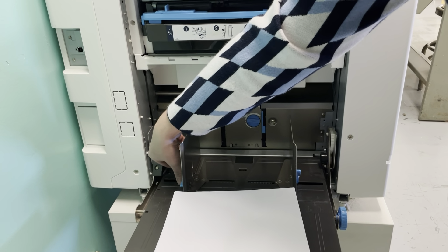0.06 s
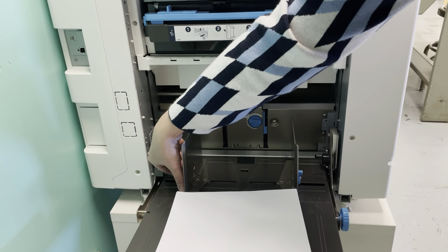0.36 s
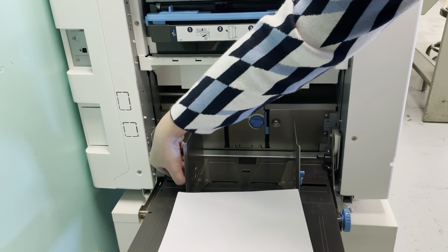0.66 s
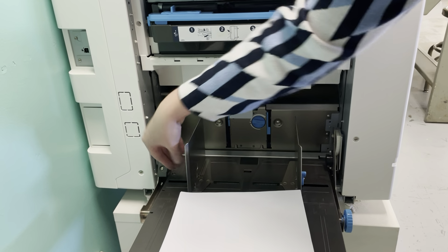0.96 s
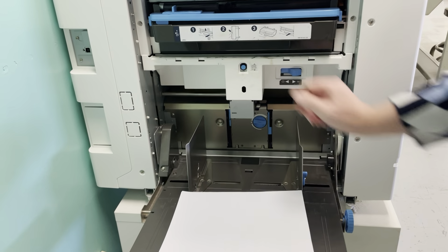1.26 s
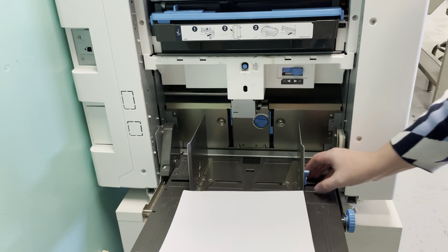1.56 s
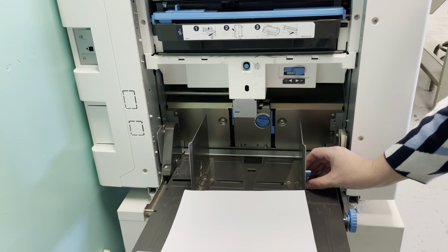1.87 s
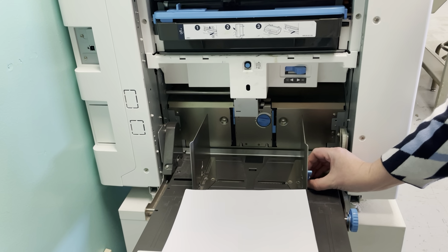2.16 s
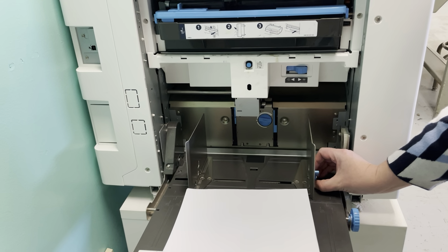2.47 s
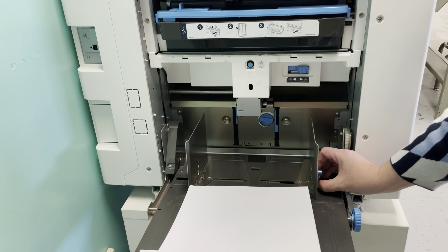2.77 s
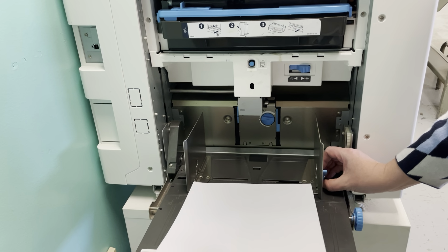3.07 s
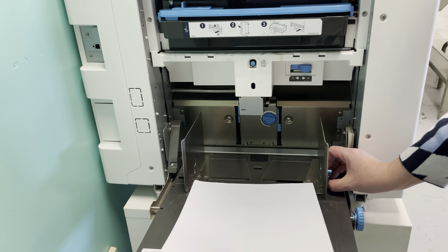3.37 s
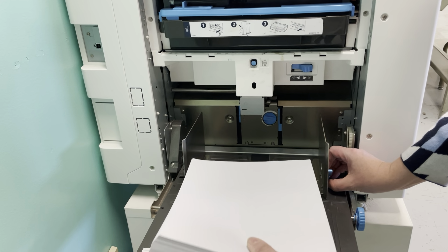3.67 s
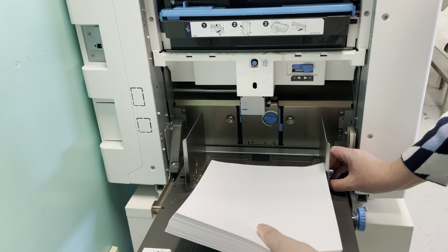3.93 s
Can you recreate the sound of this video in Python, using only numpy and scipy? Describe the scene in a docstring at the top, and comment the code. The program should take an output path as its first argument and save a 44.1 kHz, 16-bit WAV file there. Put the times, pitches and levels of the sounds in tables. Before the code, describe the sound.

Sharp clicks of a printer's paper guides being set, over steady fan noise and hum.

```python
"""Setting a printer's paper guides

A hand sets the plastic guides on the feed tray, over steady fan noise and motor hum. The left lock
lever knocks, snaps over with a short metallic ring and seats; each click rings tray, guide and latch.
The right guide is gripped and nudged: it ticks, catches and scrapes in its rail. The pushed tray
gives short hollow notes, and skin and paper brush it faintly."""
import sys
import numpy as np
from scipy import signal
from scipy.fft import rfft, irfft
from scipy.io import wavfile

SR = 44100
rng = np.random.default_rng(int(sys.argv[2]) if len(sys.argv) > 2 else 0)


def materialize(psi):
    """Save the field psi as 16-bit PCM at rate SR to the path in sys.argv[1].

    A 1-D psi becomes a single channel; in a 2-D psi each row is a channel.
    """
    bounded = np.clip(np.atleast_2d(psi).T, -1, 1)
    quanta = np.round(bounded * 32767).astype(np.int16)
    wavfile.write(sys.argv[1], SR, quanta)


N = 176400
T = np.arange(N) / SR
HZ = np.maximum(np.arange(N // 2 + 1) * SR / N, 1)
SIDES = np.array([[.5], [-.5]])  # left, right
ATTACK_S, SLIDE_EDGE_S, SLIP_RATE_HZ = 0.0015, 0.041, 210

# coherence of the two microphones: (frequency [Hz], coherence [0-1])
COHERENCE = [(40, 1), (110, 0.97), (200, 1), (320, 0.16), (700, 0.25), (1300, 0.046), (3000, 0.15),
             (5000, 0.37), (8000, 1), (15000, 1)]


def from_db(db):
    """Decibels to gain."""
    return 10 ** (np.asarray(db) / 20)


def unit_rms(x):
    """Scale to rms 1."""
    return x / np.sqrt(np.mean(np.abs(x) ** 2) + 1e-20)


def at_hz(points, hz=HZ):
    """Interpolate a table over log frequency."""
    freqs, values = np.transpose(points)
    return np.interp(np.log(hz), np.log(np.maximum(freqs, 1)), values)


def drift(rate_hz):
    """Random wander, rms 1: noise through two low-pass poles at rate_hz."""
    step, settle = 40, 2000
    pole = np.exp(-2 * np.pi * rate_hz * step / SR)
    white = rng.standard_normal(N // step + settle + 2)
    slow = signal.lfilter([1], [1, -2 * pole, pole * pole], white)[settle:]
    return np.interp(np.arange(N) / step, np.arange(len(slow)), unit_rms(slow))


def noise(gain):
    """Partly coherent stereo noise shaped by a gain per frequency, rms 1."""
    mid, side = rfft(rng.standard_normal((2, N)))
    coherence = at_hz(COHERENCE)
    spectrum = np.sqrt(1 + coherence) * mid + np.sqrt(1 - coherence) * side * [[1], [-1]]
    return unit_rms(irfft(gain * spectrum, N))


def contact(start_s, hold_s, t60_s):
    """Impact envelope: quick rise, short hold, exponential decay."""
    age = T - start_s
    return np.clip(age / ATTACK_S, 0, 1) * from_db(-60 * np.clip((age - hold_s) / t60_s, 0, 3))


def ring(modes, hits):
    """Each hit (time [s], level [dB]) excites damped modes at random phases."""
    out, age = np.zeros(N + SR), T[:SR // 2]
    for hz, mode_db, t60_s in modes:
        envelope = np.minimum(age / ATTACK_S, 1) * from_db(mode_db - 60 * age / t60_s)
        for start_s, hit_db in hits:
            i = int(start_s * SR)
            phase = 2 * np.pi * hz * age + rng.uniform(0, 2 * np.pi)
            out[i:i + len(age)] += from_db(hit_db) * envelope * np.sin(phase)
    return out[:N]


def friction(strokes, colour, edge_s, rough_db=1):
    """Ramped strokes of noise, roughened by tiny slips."""
    envelope = 0
    for start_s, length_s, db in strokes:
        inside_s = np.minimum(T - start_s, start_s + length_s - T)
        envelope += from_db(db) * np.clip(inside_s / edge_s + .5, 0, 1)
    slips = unit_rms(from_db(rough_db * drift(SLIP_RATE_HZ)))
    return envelope * slips * noise(from_db(at_hz(colour)))


def fans(level_db=-41):
    """Steady rush of fans and ventilation."""
    # (frequency [Hz], relative density [dB])
    colour = [(15, -46), (25, -14), (39, 2.5), (55, 2), (90, -5.5), (125, -5.5), (154, -12.5), (200, -11),
              (270, -14.5), (345, -15), (420, -15), (520, -18), (700, -16.5), (950, -19.5), (1300, -23),
              (1700, -27.5), (2250, -31.5), (3100, -32.5), (4100, -39.5), (5300, -39.5), (6900, -40.5),
              (8300, -48.5), (10500, -53.5), (13000, -55.5), (15500, -65)]
    return from_db(level_db) * noise(from_db(at_hz(colour)))


def motor_tone(hz, unsteady, waver_hz=6.17):
    """Stereo tone, rms 1; the unsteady share of its power wanders in level and phase."""
    wander = drift(waver_hz) + 1j * drift(waver_hz)
    amplitude = np.sqrt(1 - unsteady) + np.sqrt(unsteady / 2) * wander
    mic_phase = np.arccos(at_hz(COHERENCE, hz)) * SIDES
    return unit_rms(np.real(amplitude * np.exp(1j * (2 * np.pi * hz * T + mic_phase))))


def motor_hum():
    """Wavering motor tones; the two clearest swell and fade."""
    # (frequency [Hz], level [dB], unsteady share [0-1])
    tones = [(56.7, -49, 0.85), (81.04, -44, 0.85), (120.9, -55.5, 0.74), (616, -65, 0.9), (673, -59, 0.53),
             (925, -64, 0.6), (1510, -69.5, 0.94), (1750, -72, 0.74), (2673, -78.5, 0.9), (3256, -80, 0.9)]
    # swells of the two clearest tones: (time [s], level [dB])
    low_swell = [(0, -48), (0.2, -56), (0.55, -55.5), (0.65, -45.5), (0.85, -48), (0.95, -57), (1.3, -54),
                 (1.9, -56), (2.2, -54), (2.6, -55), (3.05, -48.5), (3.3, -51), (3.5, -59), (3.72, -47.5),
                 (3.85, -59.5), (4, -46)]
    high_swell = [(0, -56), (0.2, -52), (0.55, -50), (0.8, -53), (1.15, -53.5), (1.35, -58), (1.6, -49),
                  (2.05, -62), (2.6, -52.5), (3, -57.5), (3.4, -49.5), (3.75, -61), (4, -45)]
    out = sum(from_db(db) * motor_tone(hz, unsteady) for hz, db, unsteady in tones)
    for hz, swell in ((220.8, low_swell), (398.5, high_swell)):
        out += from_db(np.interp(T, *np.transpose(swell))) * motor_tone(hz, unsteady=0.21)
    return out


def brushes():
    """Skin and paper brush the tray with a faint hiss."""
    # (start [s], length [s], level [dB])
    strokes = [(0.015, 0.083, -69), (0.135, 0.054, -68), (0.28, 0.055, -69), (1.53, 0.079, -70),
               (2.34, 0.063, -66), (2.41, 0.12, -70), (2.84, 0.19, -70.5)]
    # (frequency [Hz], relative density [dB])
    colour = [(1000, 2), (2500, 1), (6000, 0), (11000, 2.5), (16000, -2)]
    return friction(strokes, colour, SLIDE_EDGE_S)


def tray_groans(roughness=.45, waver_rms_hz=55):
    """The pushed tray gives short hollow notes, rough and unsteady in pitch."""
    # (centre [s], length [s], pitch [Hz], level [dB])
    notes = [(0.124, 0.028, 700, -49), (1.664, 0.06, 757, -52), (2.894, 0.049, 727, -45.5),
             (2.97, 0.031, 780, -42), (3.37, 0.15, 764, -53.5)]
    waver_hz = waver_rms_hz * drift(rate_hz=110)
    out = 0
    for centre_s, length_s, hz, db in notes:
        swell = np.cos(np.pi * np.clip((T - centre_s) / length_s, -.5, .5)) ** 2
        phase = 2 * np.pi * np.cumsum(hz + waver_hz) / SR
        out += from_db(db) * swell * unit_rms(np.sin(phase))
    return out * (1 + roughness * drift(SLIP_RATE_HZ))


def finger_ticks():
    """Fingers tap the guides: small bright noise bursts."""
    # (time [s], level [dB])
    taps = [(0.548, -53.5), (1.424, -58), (1.641, -53.5), (1.654, -58), (1.664, -58), (1.687, -53),
            (2.828, -61), (2.995, -58), (3.037, -51), (3.822, -48), (3.979, -53)]
    # (frequency [Hz], relative density [dB])
    colour = [(500, -8), (1500, 10), (3500, 8.5), (6500, 5), (10000, -1.5), (16000, -5)]
    envelope = sum(from_db(db) * contact(start_s, hold_s=0.0033, t60_s=0.094) for start_s, db in taps)
    return envelope * noise(from_db(at_hz(colour)))


def lock_lever():
    """Each click rings tray floor, left guide and latch, and rattles the tray's dense modes."""
    # clicks and rebounds: (time [s], contact [s], 6 x tray band [dB], floor [dB], guide [dB], latch [dB])
    clicks = [(0.7790, 0.0061, -45.5, -45, -39, -45.5, -40.5, -48, -35.5, -46, -70),
              (0.8105, 0.003, -62, -60, -51, -61, -63, -72, -53, -70, -70),
              (0.8605, 0.015, -59, -67, -48, -53, -51, -56, -49, -70, -71),
              (0.8815, 0.003, -71, -62, -60, -56, -57, -55, -68, -70, -52),
              (0.8927, 0.0042, -67, -69, -43, -39, -47, -42, -48.5, -52, -36),
              (0.9840, 0.003, -73, -67, -46, -55, -59, -62, -66, -57, -70),
              (0.9878, 0.003, -52, -43, -43, -41, -39.5, -47.5, -50, -32, -70),
              (1.0110, 0.001, -60, -51, -56, -63, -70, -76, -70, -53, -70),
              (2.1958, 0.006, -67, -62, -52, -53, -51.5, -51.5, -72, -67, -70)]
    # modes of tray floor, plastic guide and metal latch: (frequency [Hz], gain [dB], t60 [s])
    floor_modes = [(428, -4, .1), (748, 1.5, .11), (918, -2, .08), (1080, -2, .08), (1260, -6, .06),
                   (1561, -13, .13), (2380, -8, .06), (2668, -7, .095), (3960, -15, .09)]
    guide_modes = [(721, -5, .16), (880, -5, .09), (958, -6, .15), (1030, -4, .08), (1790, -1, .065),
                   (1873, -13, .1), (2230, -6, .05), (2440, -10, .09), (2720, -6, .06), (3580, -9, .07),
                   (3900, -8, .055), (4520, -10, .06)]
    latch_modes = [(2371, -9, .1), (2869, -6, .1), (3349, -1, .065), (3526, 0.5, .06), (3680, 1, .04),
                   (4005, -10, .08), (4250, -2.5, .05), (5744, 6, .095), (7028, -5.5, .085),
                   (7246, -7, .085), (7600, -9, .06), (10070, -10, .045), (11570, -16, .046),
                   (14780, -15, .06)]
    # dense tray modes as noise bands: (low edge [Hz], high edge [Hz], t60 [s])
    tray_bands = [(167, 530, 0.18), (595, 1500, 0.11), (1160, 2560, 0.11), (2500, 4700, 0.089),
                  (5270, 7200, 0.062), (8000, 14700, 0.039)]
    out = np.zeros((2, N))
    for column, modes in enumerate((floor_modes, guide_modes, latch_modes), start=8):
        out += ring(modes, [(click[0], click[column]) for click in clicks])
    for column, (low_hz, high_hz, t60_s) in enumerate(tray_bands, start=2):
        detuning = (HZ ** 2 - low_hz * high_hz) / (HZ * (high_hz - low_hz))
        band_pass = 1 / np.sqrt(1 + detuning ** 6)
        envelope = sum(from_db(click[column]) * contact(click[0], click[1], t60_s) for click in clicks)
        out += envelope * noise(band_pass)
    return out


def guide_catches():
    """The right guide catches in its rail; each jolt rings the plastic."""
    # (time [s], level [dB])
    jolts = [(1.6402, -40.5), (1.6515, -43), (1.6633, -40), (1.6743, -44), (1.687, -43), (1.693, -45),
             (2.947, -56), (3.002, -47), (3.358, -49), (2.1965, -44)]
    # (frequency [Hz], gain [dB], t60 [s])
    modes = [(1432, -6, .06), (1535, 0, .05), (1690, -5, .03), (1780, -4, .06), (2230, -9, .04),
             (2650, -8, .025), (3750, -14, .025)]
    return ring(modes, jolts)


def guide_scrapes():
    """The right guide scrapes briefly along its rail."""
    # (start [s], length [s], level [dB])
    strokes = [(1.643, 0.038, -49), (1.688, 0.014, -52)]
    # (frequency [Hz], relative density [dB])
    colour = [(250, 4), (420, 2), (1100, -7), (1400, 12), (1700, -2), (2000, -9), (2700, -2), (4500, -11),
              (8000, -29), (16000, -23)]
    return friction(strokes, colour, edge_s=0.013)


def shoves():
    """Dull friction as guide and paper stack are shoved."""
    # (start [s], length [s], level [dB])
    strokes = [(2.35, 0.079, -51), (2.86, 0.061, -50.5), (2.942, 0.062, -48), (3.345, 0.059, -46.5)]
    # (frequency [Hz], relative density [dB])
    colour = [(300, -27), (600, 3.5), (820, 2), (1100, 0.5), (1450, -1), (2200, -14.5), (6000, -25.5),
              (16000, -47)]
    return friction(strokes, colour, SLIDE_EDGE_S)


def room(direct, level_db=-23, t60_s=.22):
    """Short diffuse tail, duller than the direct sound."""
    age = T[:SR // 2]
    dull_noise = signal.lfilter([.5], [1, -.5], rng.standard_normal((2, len(age))))
    tail = dull_noise * from_db(-60 * age / t60_s)
    tail /= np.sqrt(np.sum(tail ** 2) / 2)
    return from_db(level_db) * signal.fftconvolve(direct, tail, axes=1)[:, :N]


def scene():
    """Machine hum, the hand's work on the tray and its reverberation."""
    machines = fans() + motor_hum()
    handling = brushes() + tray_groans() + finger_ticks() + lock_lever()
    handling += guide_catches() + guide_scrapes() + shoves()
    return machines + handling + room(handling)


def record(dry, cutoff_hz=15900):
    """Two microphones differing in level and phase, then a steep low-pass."""
    # (frequency [Hz], left over right [dB])
    balance = [(60, 0.5), (200, 4.5), (380, -2.5), (1300, -1), (4400, 0)]
    # (frequency [Hz], left phase lead [rad])
    lead = [(400, 0), (750, 0), (1050, -1.2), (1550, 1.7), (1800, .9), (2300, .4), (2700, -.8),
            (4500, -1.2), (5700, -3.9), (6800, -6.3), (8600, -9), (10600, -6.3), (11800, -5.5),
            (13300, -2.8), (15000, 0)]
    response = from_db(SIDES * at_hz(balance)) * np.exp(1j * SIDES * at_hz(lead))
    low_pass = signal.ellip(10, .1, 80, cutoff_hz, fs=SR, output="sos")
    return signal.sosfilt(low_pass, irfft(rfft(dry) * response, N))


dry = scene()
out = record(dry)
materialize(out)
```